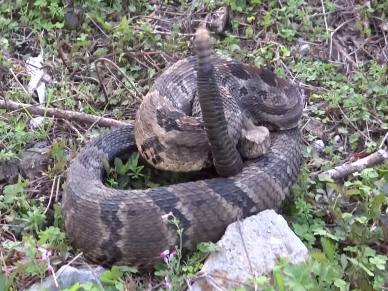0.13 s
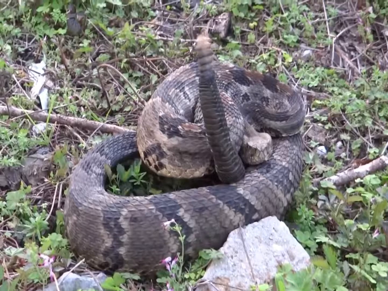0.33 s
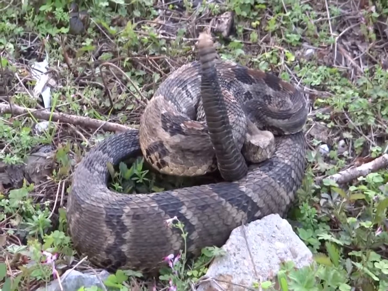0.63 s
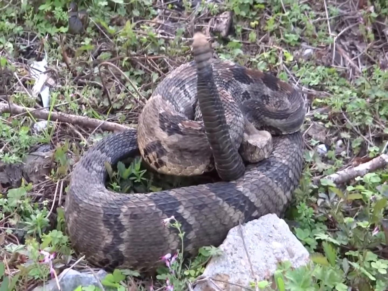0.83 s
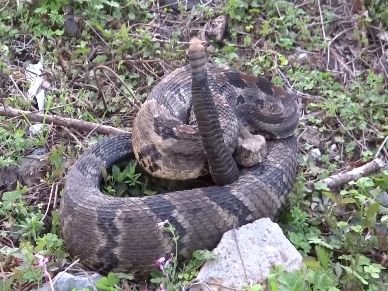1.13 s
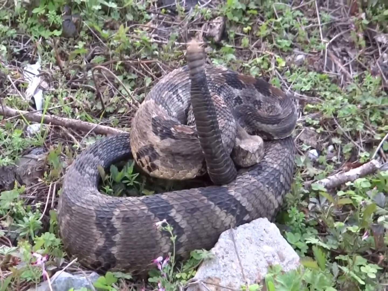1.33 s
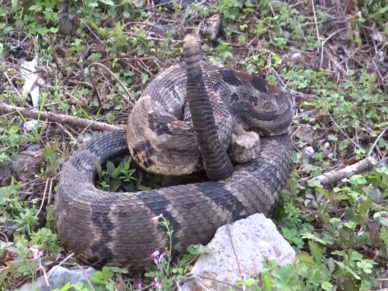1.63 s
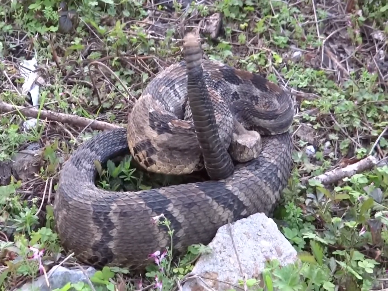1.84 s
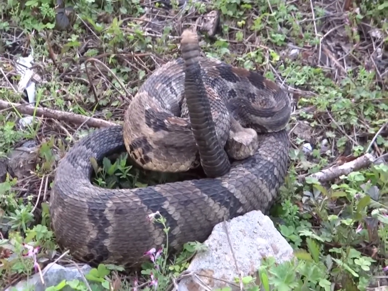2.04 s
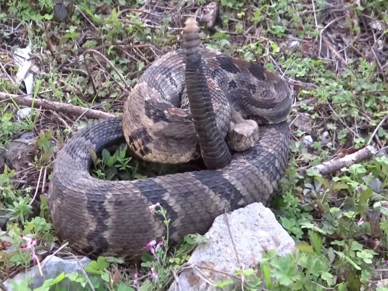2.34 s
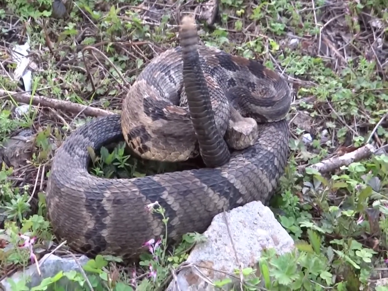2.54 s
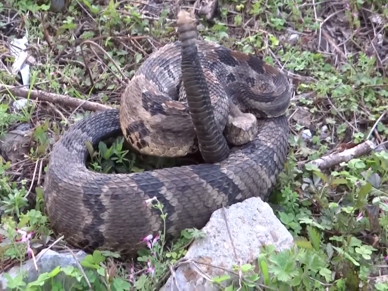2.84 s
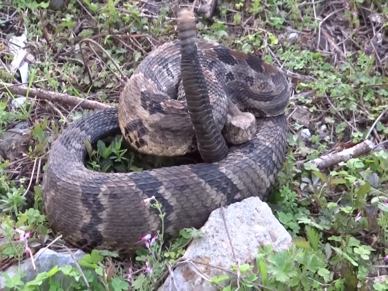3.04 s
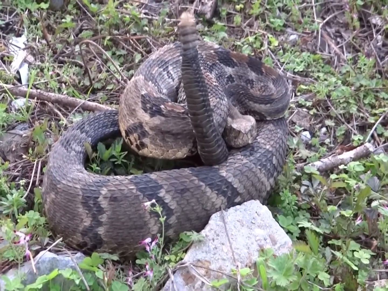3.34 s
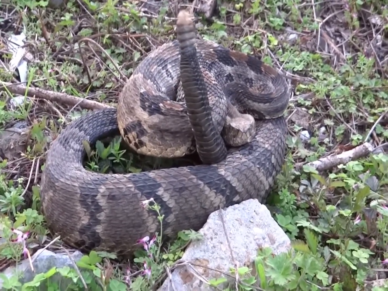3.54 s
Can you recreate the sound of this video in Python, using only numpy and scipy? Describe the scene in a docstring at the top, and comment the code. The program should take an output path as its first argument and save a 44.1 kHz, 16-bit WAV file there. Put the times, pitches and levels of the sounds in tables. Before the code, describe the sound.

Quickly fading in, a crisp rattlesnake rattle buzzes without pause, roughens around the middle and steadies again; far engines hum quietly beneath soft wind, in the open among low plants, heard close and centred.

```python
"""A rattlesnake buzzes its tail among low plants, close by, with two engines droning far off over soft wind.
Out of faint hiss the buzz fades in quickly: the tail shakes nearly a hundred times a second, and each
stroke knocks the dry, hollow segments together. One engine note swells early, then sinks. Around the middle
the loose rattle's own slower swing grows and the buzz stutters most. Later the shaking is mostly firmer,
and the engine note swells again, ending on a rise."""
import sys
import numpy as np
from scipy import signal
from scipy.fft import rfft, irfft
from scipy.io import wavfile
from scipy.ndimage import uniform_filter1d, minimum_filter1d

SR = 44100
rng = np.random.default_rng(int(sys.argv[2]) if len(sys.argv) > 2 else 0)


def inscribe(sig):
    """Save sig as 16-bit PCM at rate SR to the path in sys.argv[1].

    A 1-D sig is mono; a 2-D sig holds one channel per row.
    Samples are clipped to [-1, 1] before scaling.
    """
    pcm = np.round(np.clip(np.atleast_2d(sig).T, -1, 1) * 32767)
    wavfile.write(sys.argv[1], SR, pcm.astype(np.int16))


N = 162288
T = np.arange(N) / SR


def amp(db):
    """Decibels to gain."""
    return 10 ** (np.asarray(db) / 20)


def unit(x):
    """Scales to an rms of one."""
    return x / np.sqrt(np.mean(x ** 2) + 1e-20)


def read(points, hz):
    """Reads a spectrum on a log-frequency axis."""
    f, value = np.transpose(points)
    return np.interp(np.log(hz + 1), np.log(f), value)


def curve(table, column):
    """One column of a time table, at every sample; column 0 is the first after the time."""
    table = np.array(table)
    return np.interp(T, table[:, 0], table[:, column + 1])


def colour(x, points):
    """Filters with the given spectrum; the minimum-phase response never sounds before its cause."""
    log_gain = np.log(amp(read(points, abs(np.fft.fftfreq(4096, 1 / SR)))))
    taps = np.fft.ifft(np.exp(np.conj(signal.hilbert(log_gain)))).real
    return signal.oaconvolve(x, taps[:len(taps) // 2])[:N]


def noise(points):
    """Steady noise with the given spectrum."""
    gain = amp(read(points, np.fft.rfftfreq(N, 1 / SR)))
    return unit(irfft(rfft(rng.standard_normal(N)) * gain, N))


def drift(rate_hz):
    """Random wander up to about the given rate, with an rms of one."""
    f = np.fft.rfftfreq(N, 1 / SR)
    gain = (f > 0) * np.exp(-(f / rate_hz) ** 2)
    return unit(irfft(rfft(rng.standard_normal(N)) * gain, N))


# colour of the wind and far rumble: (frequency [Hz], relative level [dB per Hz])
RUMBLE_COLOUR = [(15, -18), (40, 0), (80, -13), (110, 0), (170, -5), (250, -3.5), (330, -12), (430, -16.5),
                 (550, -22.5), (900, -28.5), (3000, -15)]
RUMBLE_DB, GUST_DB = -42, -0.4


def wind():
    """Soft wind and far rumble: low-pitched noise whose level wanders slightly."""
    return amp(RUMBLE_DB + GUST_DB * drift(4)) * noise(RUMBLE_COLOUR)


# colour of the faint air all around: (frequency [Hz], relative level [dB per Hz])
AIR_COLOUR = [(100, -21), (300, 4), (500, 0), (800, -2), (1500, -27), (8000, -39)]
AIR_SIDE_DB = -66


def air():
    """Faint diffuse air: steady noise for the difference between the ears."""
    return amp(AIR_SIDE_DB) * noise(AIR_COLOUR)


# notes of the two engines, as multiples of the cycle rate: (order [cycles], relative level [dB])
ENGINE_A_ORDERS = [(3, -4), (5, 1.5), (7, -12.5), (8, -10), (9, -8.5), (10, -15.5), (12, -19.5),
                   (13, -23.5), (15, -22)]
ENGINE_B_ORDERS = [(2.5, -10), (3, -12.5), (5, -11), (6, -1), (7, -14.5), (9, -4.5), (10, -21.5), (13, -31)]
ENGINE_A_HZ, ENGINE_A_DB = 30.4, -43.5  # cycle rate and level
ENGINE_B_HZ, ENGINE_B_DB = 26.59, -42
ENGINE_WANDER, ENGINE_FADING_DB = 0.0022, 2.5  # rms wander, pitch as a share


def engine(cycle_hz, orders, level_db):
    """Low orders of a far engine, each fading in and out on its way through the air."""
    turns = np.cumsum(cycle_hz * (1 + ENGINE_WANDER * drift(4.0))) / SR
    total = np.zeros(N)
    for order, db in orders:
        fading = amp(db + ENGINE_FADING_DB * drift(2.0))
        total += fading * np.sin(2 * np.pi * (order * turns + rng.random()))
    return amp(level_db) * unit(total)


# the first engine's strongest note swells and sinks: (time [s], level [dB])
DRONE_LEVEL = [(.2, -54), (.6, -43), (.9, -47.5), (1.35, -52), (2.05, -49), (2.39, -38), (2.75, -50),
               (3.25, -42), (3.66, -37)]
DRONE_ORDER = 6


def drone():
    """The strongest note of the first engine: a slightly wandering tone, slowly swelling and sinking."""
    turns = np.cumsum(DRONE_ORDER * ENGINE_A_HZ * (1 + ENGINE_WANDER * drift(2.6))) / SR
    return amp(curve(DRONE_LEVEL, 0)) * unit(np.sin(2 * np.pi * (turns + rng.random())))


# how long reflections from ground and plants last: (frequency [Hz], time to fall 60 dB [s])
SCATTER_T60 = [(500, 0.042), (4000, 0.034), (14000, 0.017)]
SCATTER_DB, SCATTER_WIDTH = -21, 0.22  # width: gain of the part that differs between the ears


def scatter(x):
    """A faint, short wash of reflections from ground and leaves: noise that dies faster at high pitch."""
    hz, t, grains = signal.stft(rng.standard_normal(SR // 4), SR, nperseg=256)
    decay = np.exp(-np.log(1000) * t / read(SCATTER_T60, hz)[:, None])
    tail = signal.istft(grains * decay, SR, nperseg=256)[1]
    return amp(SCATTER_DB) * signal.oaconvolve(x, tail / np.linalg.norm(tail))[:N]


# (time [s], tail rate [Hz], rate of the rattle's own swing [Hz], share of that swing [0-1])
SHAKING = [(0.12, 99.7, 79.6, 0.1), (0.22, 100.6, 80.9, 0.12), (0.33, 100.2, 79.3, 0.48),
           (0.45, 99.3, 66.6, 0.14), (0.6, 102.0, 74.1, 0.35), (0.72, 97.9, 81.2, 0.18),
           (0.9, 98.0, 78.3, 0.18), (1.08, 95.5, 81.5, 0.17), (1.2, 94.8, 73.8, 0.4),
           (1.33, 91.6, 75.7, 0.28), (1.46, 96.1, 77.3, 0.71), (1.58, 87.3, 71.3, 0.5),
           (1.72, 93.0, 67.7, 0.53), (1.9, 90.6, 72.3, 0.55), (2.04, 93.8, 68.1, 0.27),
           (2.16, 96.9, 79.2, 0.8), (2.3, 95.3, 80.2, 0.0), (2.45, 101.2, 82.7, 0.33),
           (2.6, 98.1, 77.2, 0.0), (2.75, 97.9, 75.2, 0.43), (2.95, 96.0, 71.4, 0.43),
           (3.12, 98.2, 74.1, 0.0), (3.3, 95.6, 69.9, 0.23), (3.5, 95.8, 64.4, 0.34),
           (3.67, 94.3, 74.9, 0.29)]
# vigour of the shaking: (time [s], relative level [dB])
SHAKING_VIGOUR = [(.12, -2), (.35, 0), (.6, 1.5), (1.1, 1), (1.35, -0.5), (1.5, 1), (1.65, -4), (1.8, -2.5),
                  (1.95, -5), (2.06, -1.5), (2.2, -1), (2.4, 1.7), (2.8, 1), (3.2, 1), (3.66, 0)]
# a missed beat (negative) or a harder flick (positive): (time [s], change in level [dB])
SHAKING_LURCHES = [(1.19, -3.5), (1.422, 0), (1.446, -1.5), (1.486, -10.5), (1.507, 0.5), (1.546, -10),
                   (1.557, 2), (1.592, -5.5), (1.62, 1.5), (1.687, -6.5), (1.706, -1), (1.755, 2),
                   (1.798, 1), (1.918, 3.5), (2.097, 1), (2.114, 2.5), (2.14, -2.5), (2.17, 2),
                   (3.52, -3.5)]
LURCH_S = .01  # time from a lurch's middle until it has shrunk to about a third
STROKE_RISE_S, STROKE_FALL_S, STROKE_LEAD_S = 0.0017, 0.0028, 0.0012
STROKE_JITTER_S, STROKE_SPREAD_DB = 0.00045, .5
FORCE_POWER = .38  # below 1, so wide and narrow strokes differ less in force
LOOSE_DB, LOOSE_SPREAD_DB, LOOSE_FLICKER_HZ = -20, 6, 111


def strokes():
    """Force on the segments: a quick swell each time tail shake and loose swing throw the rattle over."""
    tail_hz, swing_hz, share = [curve(SHAKING, column) for column in range(3)]
    share = np.clip(share, 0, 1)
    tail = np.exp(2j * np.pi * np.cumsum(tail_hz) / SR)
    swing = np.exp(2j * np.pi * np.cumsum(swing_hz) / SR)
    # the two circling motions help or cancel each other, so the buzz stutters
    motion = (1 - share) * tail + share * swing
    reach = abs(motion) / np.hypot(share, 1 - share)
    upward = (motion.imag[:-1] < 0) & (motion.imag[1:] >= 0)
    at = np.flatnonzero(upward & (motion.real[1:] > 0))

    # each stroke is a little early or late, strong or weak
    late, strong = np.clip(rng.standard_normal((len(at), 2)), -2, 2).T
    shift = ((late * STROKE_JITTER_S - STROKE_LEAD_S) * SR).astype(int)
    hits = np.zeros(N)
    hits[np.clip(at + shift, 0, N - 1)] = reach[at] ** FORCE_POWER * amp(STROKE_SPREAD_DB * strong)
    t = np.arange(-1000, 1001) / SR
    rise = -(t / STROKE_RISE_S) ** 2
    fall = -(abs(t) / STROKE_FALL_S) ** 0.92
    swells = signal.oaconvolve(hits, np.exp(np.where(t < 0, rise, fall)), "same")

    # segments also tumble between strokes
    loose = amp(LOOSE_DB + LOOSE_SPREAD_DB * np.clip(drift(LOOSE_FLICKER_HZ), -2, 2))
    lurch_db = sum(db * np.exp(-((T - s) / LURCH_S) ** 2) for s, db in SHAKING_LURCHES)
    return np.hypot(swells * amp(curve(SHAKING_VIGOUR, 0)), loose) * amp(lurch_db)


# colour of the hollow keratin shells: (frequency [Hz], relative level [dB per Hz])
SHELL_COLOUR = [(300, -45.5), (800, -43.5), (1050, -33.5), (2050, -27), (2350, -20), (2620, -9),
                (2820, -14), (3200, -6.5), (3500, 0.8), (3800, -0.5), (4120, 0.1), (5000, -4), (5400, -.3),
                (5850, -7.5), (7000, -8), (7600, -3), (8500, -4), (9300, -10.5), (10400, -11.5),
                (10900, -16.5), (11700, -14.5), (12400, -19), (13600, -18), (15000, -27), (16000, -41)]
RATTLE_DB = -19.5
CLICKS_PER_S, CLICK_SPREAD_DB, SCRAPE_DB = 4500, 2, -7.5
CONTACT_HOLD_S = .009  # how long one group of contacts stays in touch
SEGMENT_T60_S, SEGMENT_RING_DB = 0.0039, 2.5  # ring: time to fall 60 dB, level against its click


def rattle(count=32, size=5):
    """Strokes set off clicks at a few contacts between segments, each with its own short ring, and scraping."""
    force = strokes()
    happens = rng.random(N) < CLICKS_PER_S / SR
    sign = rng.choice([-1., 1.], N)
    strength = amp(CLICK_SPREAD_DB * np.clip(rng.standard_normal(N), -2, 2))
    clicks = unit(happens * sign * strength)

    # every hold picks a new group of neighbours; each click falls on one of them
    touching = rng.integers(0, count, N)[(T / CONTACT_HOLD_S).astype(int)]
    contact = (touching + rng.integers(0, size, N)) % count
    t = np.arange(1024) / SR
    out = amp(SCRAPE_DB) * force * rng.standard_normal(N)
    for k in range(count):
        ring = rng.standard_normal(len(t)) * np.exp(-np.log(1000) * t / SEGMENT_T60_S)
        ring *= amp(SEGMENT_RING_DB) / np.linalg.norm(ring)
        ring[0] = 1  # the click itself
        out += signal.oaconvolve(force * clicks * (contact == k), ring)[:N]
    return amp(RATTLE_DB) * unit(colour(out, SHELL_COLOUR))


def scene():
    """Snake, engines and wind lie in the middle; only the scatter and a little air are wide."""
    snake = rattle()
    engine_a = engine(ENGINE_A_HZ, ENGINE_A_ORDERS, ENGINE_A_DB) + drone()
    engine_b = engine(ENGINE_B_HZ, ENGINE_B_ORDERS, ENGINE_B_DB)
    mid = wind() + engine_a + engine_b + scatter(snake) + snake
    side = air() + SCATTER_WIDTH * scatter(snake)
    return np.array([mid + side, mid - side])


CEILING_DB, LIMITER_S = -3.5, 0.0038


def limit(x):
    """A quick, soft limiter turns down the hardest strokes near the ceiling, both sides alike."""
    size = int(LIMITER_S * SR) | 1
    peak = -minimum_filter1d(-abs(x).max(0), size)
    gain = (1 + (peak / amp(CEILING_DB)) ** 4) ** -.25
    smooth_gain = uniform_filter1d(uniform_filter1d(gain, size // 2), size // 2)
    return x * smooth_gain


START_S, FADE_IN_S = 0.12, 0.13
HISS_DB, EDGE_HZ = -104, 15900  # edge: the treble above it is cut


def record(dry):
    """The sound fades in quickly out of faint hiss; then come the limiter and the band limit."""
    fade = np.clip((T - START_S) / FADE_IN_S, 0, 1)
    faded = dry * fade + amp(HISS_DB) * noise(RUMBLE_COLOUR)
    low_pass = signal.firwin(511, EDGE_HZ, window=("kaiser", 9), fs=SR)
    return signal.oaconvolve(limit(faded), low_pass[None], "same")


dry = scene()
out = record(dry)
inscribe(out)
```